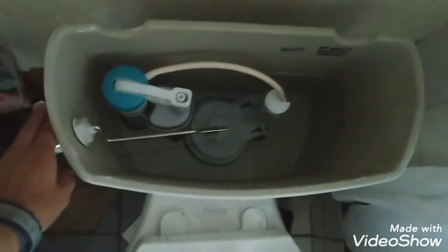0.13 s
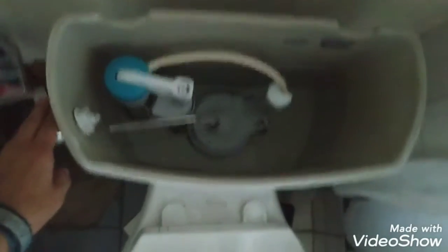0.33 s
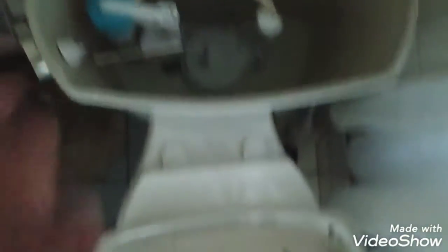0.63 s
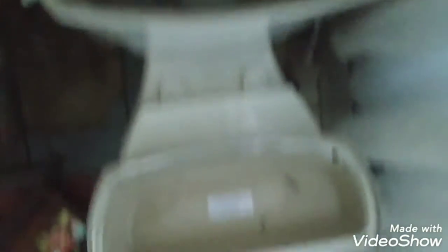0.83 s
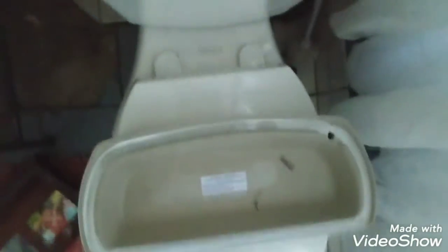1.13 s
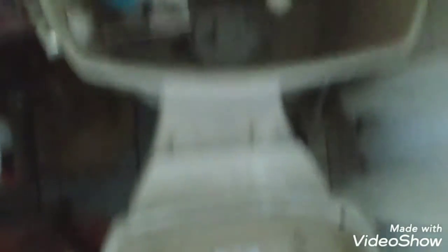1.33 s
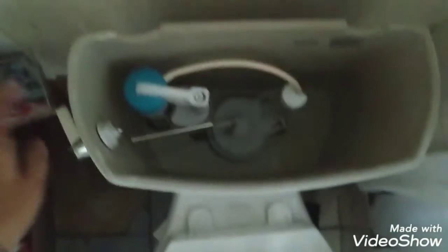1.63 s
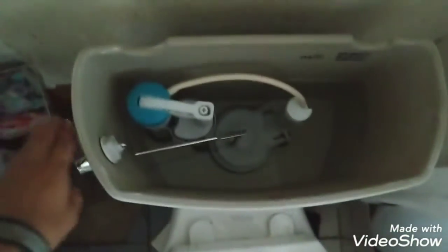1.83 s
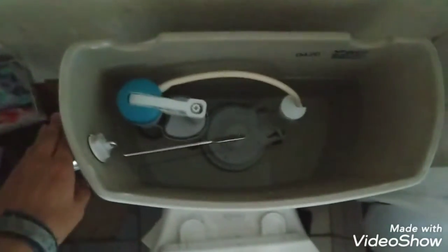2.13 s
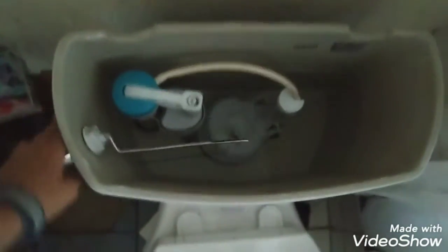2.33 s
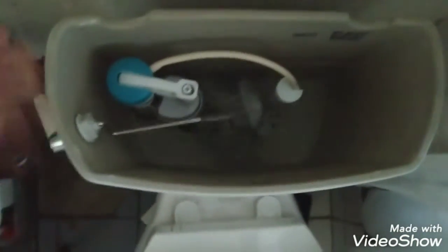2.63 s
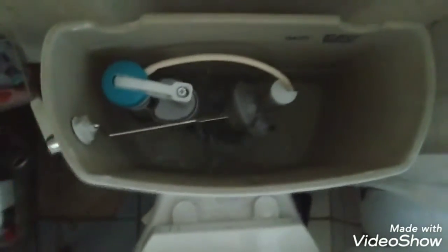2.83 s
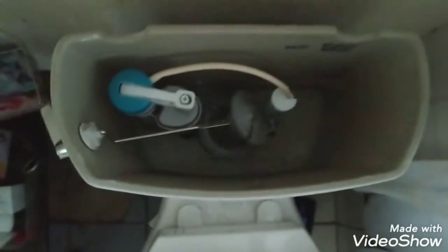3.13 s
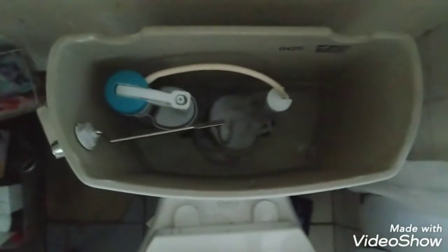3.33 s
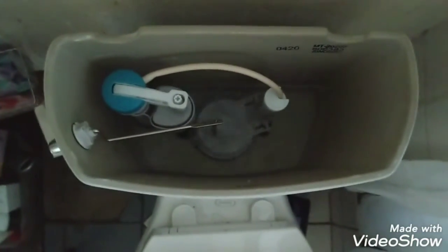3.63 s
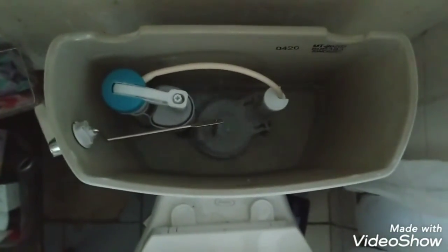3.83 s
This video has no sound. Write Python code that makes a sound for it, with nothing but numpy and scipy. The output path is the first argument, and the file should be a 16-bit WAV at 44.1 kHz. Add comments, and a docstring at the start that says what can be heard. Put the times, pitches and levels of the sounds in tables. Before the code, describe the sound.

Toilet flush heard from above the open tank: lever clicks, rushing gurgling water, flapper slap, refill hiss.

```python
"""An open toilet tank is flushed in a small tiled bathroom, heard from just above.
Fingers make the lever squeak, rub and knock, then scuff the microphone in bursts of tiny random clicks.
The lever lifts the flapper and its arm clinks, as wavering sines, while resonant noise, ringing bubbles
and patchy spray gulp and splash down the drain. The flapper slaps shut with a noise burst and ringing;
the fill valve starts to hiss with patchy noise and squeals with wavering sines as the last water surges."""
import sys
import numpy as np
from scipy import signal
from scipy.fft import rfft, irfft
from scipy.io import wavfile
from scipy.ndimage import uniform_filter1d

SR = 44100
rng = np.random.default_rng(int(sys.argv[2]) if len(sys.argv) > 2 else 0)


def dump_mix(stems):
    """Bounce the given channels to the path in sys.argv[1] as a 16-bit WAV at rate SR."""
    frames = np.atleast_2d(stems).T  # one column per channel
    limited = np.clip(frames, -1, 1)  # hard clip at full scale
    pcm = np.round(limited * 32767).astype(np.int16)
    wavfile.write(sys.argv[1], SR, pcm)


N = 176400
T = np.arange(N) / SR  # time in seconds

ROOM_T60_S, ROOM_DAMP_HZ = 0.18, 6800  # time for the echo to fall by 60 dB, and where its treble dulls
WATER_ROOM_DB = -2
SPRAY_PER_S = 5000


def from_db(db):
    """Turn decibels into a gain."""
    return 10 ** (np.asarray(db) / 20)


def rms_one(x):
    """Scale to unit power."""
    return x / np.sqrt(np.mean(x ** 2) + 1e-20)


def evened(x, window_s):
    """Hold the short-term power close to one."""
    window = max(int(window_s * SR), 8)
    power = np.abs(uniform_filter1d(x * x, window))
    return x / np.sqrt(power + 1e-9)


def coloured(x, colour):
    """Filter through (f/Hz, level/dB) points, with unit power gain and no sound ahead of its cause."""
    hz, db = np.transpose(colour)
    bins_hz = np.arange(N + 1) * SR / (2 * N)
    gain = rms_one(from_db(np.interp(np.log(bins_hz + 1), np.log(hz), db)))
    # folding the cepstrum gives the filter its minimum delay
    cepstrum = irfft(np.log(gain))
    cepstrum[1:N] *= 2
    cepstrum[N + 1:] = 0
    return irfft(rfft(x, 2 * N) * np.exp(rfft(cepstrum)))[:N]


def band(x, low_hz, high_hz):
    """Keep only the frequencies between two limits."""
    return signal.sosfilt(signal.butter(3, [low_hz, high_hz], "band", fs=SR, output="sos"), x)


def drift(rate):
    """Smooth random wandering of unit power; a higher rate in Hz wanders faster."""
    r = np.exp(-2 * np.pi * rate / SR)
    noise = rng.standard_normal(N + SR // 2)
    return rms_one(signal.lfilter([1], [1, -2 * r, r * r], noise)[-N:])


def grains(per_s, spread_db=3):
    """Random clicks of uneven size, scaled to unit power."""
    born = rng.random(N) < per_s / SR
    size = from_db(spread_db * np.minimum(rng.exponential(1, N), 4))
    return rms_one(born * rng.choice([-1, 1], N) * size)


def clicks(rows):
    """Place one click per (t/s, level/dB) row."""
    out = np.zeros(N)
    for s, db in rows:
        out[int(s * SR)] += from_db(db)
    return out


def ring(x, hz, t60):
    """A resonance: a unit click sets a sine of height one ringing, down 60 dB after t60 seconds."""
    r = from_db(-60 / (t60 * SR))
    w = 2 * np.pi * hz / SR
    return signal.lfilter([0, np.sin(w)], [1, -2 * r * np.cos(w), r * r], x + 1e-18)


def struck(hits, modes):
    """Hits ring the modes (f/Hz, level/dB, t60/s) of a body, with alternating sign."""
    out = 0
    for k, (hz, db, t60) in enumerate(modes):
        out = out + from_db(db) * ring(clicks(hits), hz, t60) * (-1) ** k
    return out


def stirred(modes):
    """Noise keeps resonances (f/Hz, width/Hz, level/dB) ringing, as turbulence does."""
    out = 0
    for hz, width, db in modes:
        turbulence = np.diff(rng.standard_normal(N + 1))
        t60 = np.log(1000) / (np.pi * width)
        out = out + from_db(db) * rms_one(ring(turbulence, hz, t60))
    return out


def envelope(s, attack, hold, t60):
    """Rise in a line from time s, then fall exponentially once hold seconds have passed since s."""
    rise = np.clip((T - s) / attack, 0, 1)
    return rise * from_db(-60 * np.clip((T - s - hold) / t60, 0, 3))


def strokes(rows, attack, t60):
    """Sliding contacts (t/s, length/s, final level/dB, swell/dB) change in pressure and let go."""
    out = 0
    for s, length, db, swell in rows:
        pressure_db = db + swell * np.clip((T - s) / length - 1, -1, 0)
        out = out + envelope(s, attack, length, t60) * from_db(pressure_db)
    return out


def bowed(contacts, modes, swell, hold):
    """Sliding contacts (t/s, level/dB, tilt/dB per octave) make metal modes sing, then ring out."""
    chatter_db, chatter_hz = 1.6, 112
    out = 0
    for hz, mode_db, t60 in modes:
        octaves = np.log2(hz / modes[1][0])  # distance from the second mode
        power = 0
        for s, db, tilt in contacts:
            power = power + (from_db(db + mode_db + tilt * octaves) * envelope(s, swell, hold, t60)) ** 2
        # the upper modes are rougher
        chatter = from_db(chatter_db * max(1 + octaves, .5) * drift(chatter_hz))
        out = out + np.sqrt(power) * chatter * np.sin(2 * np.pi * (hz * T + rng.random()))
    return out


def in_room(x, wet_db):
    """Add the dense, quickly dying echo of the tiles."""
    t = T[:SR // 2]
    tail = rng.standard_normal(len(t)) * from_db(-60 * t / ROOM_T60_S) * (t > .004)
    dull = np.exp(-2 * np.pi * ROOM_DAMP_HZ / SR)
    tail = signal.lfilter([1 - dull], [1, -dull], tail / np.sqrt(np.sum(tail ** 2)))
    return x + from_db(wet_db) * signal.fftconvolve(x, tail)[:N]


def bubbles(per_s, low_hz, high_hz, cycles, rise):
    """Bubbles of uneven size ring for some cycles, rising in pitch as they near the surface."""
    out = np.zeros(N + SR)
    for when, pitch, size, chance in rng.random((5000, 4)):
        if chance < per_s * N / SR / 5000:
            hz = low_hz * (high_hz / low_hz) ** pitch
            age = np.linspace(0, 1, int(cycles / hz * SR))
            start = int(when * N)
            tone = np.sin(2 * np.pi * cycles * age * (1 + rise * age / 2))
            out[start:start + len(age)] += from_db(22 * size ** 2 - 50 * age) * tone
    return rms_one(out[:N])


def spatter():
    """Quick, uneven bursts in level, as of broken water."""
    spatter_db, spatter_hz = 1.17, 30
    return from_db(spatter_db * drift(spatter_hz))


def patchy(x):
    """Pockets in the water form and vanish: each narrow band swells and fades by itself."""
    patchy_db, patches_per_s = 5, 9
    count = 80
    spectrum = rfft(x).astype(np.complex64)
    # 14 bands per octave, counted from 280 Hz
    octaves = np.log2(np.arange(len(spectrum)) * SR / N / 280 + 1e-9)
    slot = (14 * octaves).astype(int).clip(0, count - 1)
    knots = np.arange(200) / patches_per_s
    out = 0
    for k, row in enumerate(rng.standard_normal((count, len(knots) + 1))):
        swelling = from_db(patchy_db * row[1:].clip(-2, 2))
        out = out + irfft(spectrum * (slot == k), N) * np.interp(T + row[0] % 1, knots, swelling)
    return rms_one(out)


def background():
    """Quiet room noise with a faint wavering hum, made by noise ringing a narrow resonance."""
    floor_db, hum_db, hum_hz = -61.5, -68, 234.7
    # colour of the room noise: f/Hz, level/dB
    floor_colour = [(25, -9), (55, 3), (95, -10.5), (135, -3), (700, -13.5), (1600, -19.5), (16000, -31)]
    floor = coloured(rng.standard_normal(N), floor_colour)
    return from_db(floor_db) * floor + from_db(hum_db) * stirred([(hum_hz, 5, 0)])


def handling():
    """Dry scuffs right at the microphone, each with a small final thud, and bumps."""
    lift_off_hz, lift_off_t60_s, lift_off_db = 118, 0.052, -4.5
    # scuffs on the microphone: t/s, length/s, final level/dB, swell/dB
    scuff_rows = [(0.975, 0.051, -62, -4.5), (1.114, 0.012, -38, 18), (1.1403, 0.00094, -32, 0),
                  (1.144, 0.008, -42, 16), (1.237, 0.0048, -34.5, 7), (1.245, 0.015, -40, 13),
                  (1.427, 0.043, -51, 1), (1.4992, 0.0254, -21, 17)]
    # colour of the scuffs: f/Hz, level/dB
    scuff_colour = [(30, -11), (160, -3), (2400, -5.5), (4000, -9.5), (6400, -11), (7400, -21.5),
                    (8500, -31.5), (11000, -23.5), (16000, -23)]
    # bumps and pops: t/s, half length/s, f/Hz, peak level/dB
    bump_rows = [(0.983, 0.08, 67, -49.5), (0.991, 0.01, 187, -40), (1.014, 0.011, 117, -30.5),
                 (1.5273, 0.001, 770, -18.5), (3.003, 0.016, 62.4, -31), (3.744, 0.0092, 179, -23)]
    scuff = grains(9000, spread_db=-0.5) * strokes(scuff_rows, attack=0.0021, t60=0.015)
    scuff = coloured(scuff, scuff_colour)
    lift_offs = [(s + length, db + lift_off_db) for s, length, db, _ in scuff_rows]
    thud = ring(clicks(lift_offs), lift_off_hz, lift_off_t60_s)
    bumps = 0
    for s, half, hz, db in bump_rows:
        swing = np.sin(2 * np.pi * hz * (T - s))
        bumps = bumps + from_db(db) * np.exp(-((T - s) / half) ** 2) * swing
    return in_room(scuff + thud + bumps, wet_db=-28.5)


def lever():
    """The handle squeaks, rubs and knocks; its arm clinks against the stop and sings as it slides along it."""
    knock_s, crack_db, crack_t60_s = .528, -5.5, 0.013
    # the lever rubs in its seat: t/s, length/s, final level/dB, swell/dB
    rub_rows = [(.41, 0.18, -56, 6), (.526, 0.014, -54, -7), (2.16, 0.034, -55, -6)]
    # colour of the rubs: f/Hz, level/dB
    rub_colour = [(50, -54), (190, 5), (900, -6), (2500, -17), (8500, -32.5)]
    # the handle squeaks: t/s, level/dB, tilt/dB per octave
    squeaks = [(.415, -67, 9), (.429, -55, -2.5), (.549, -55.5, -1)]
    # ring of the handle: f/Hz, level/dB, t60/s
    handle_modes = [(2460, 2.5, 0.047), (4240, -6.5, 0.046), (6298, -5, 0.09), (10810, -9.5, 0.07),
                    (13900, -8, 0.07)]
    # ring of the tank wall when the handle knocks on it: f/Hz, level/dB, t60/s
    knock_modes = [(778, -48.5, 0.14), (1346, -54.5, 0.19)]
    # the arm hits its stop: t/s, level/dB, tilt/dB per octave
    clinks = [(2.482, -54.5, 0), (2.543, -48.5, 4), (2.714, -29, 0.5), (2.788, -40.5, 4.5)]
    # ring of the arm: f/Hz, level/dB, t60/s
    arm_modes = [(697, -10.5, 1), (1498, 2, 0.42), (6310, -10, 0.28), (10800, -30, 0.29)]
    rub = coloured(grains(2500) * strokes(rub_rows, attack=0.0017, t60=0.053), rub_colour)
    strength = 0
    for s, db, tilt in clinks:
        strength = strength + from_db(db + 2 * tilt + crack_db) * envelope(s, 0.00045, 0.0011, crack_t60_s)
    crack = band(grains(6300), 1970, 21000) * strength
    knock = struck([(knock_s, 0)], knock_modes)
    squeak = bowed(squeaks, handle_modes, swell=0.011, hold=0.011)
    clink = bowed(clinks, arm_modes, swell=0.0063, hold=0.032)
    return in_room(rub + crack + knock, wet_db=-1) + squeak + clink


def fill_valve():
    """The valve starts a sputtering hiss that swells while brief high squeals sound over it."""
    waver_hz, squeal_t60_s, rough_db = 108.6, 0.036, 3
    hiss_s, hiss_rise_s, hiss_db = 3.802, 0.19, -36
    # squeals: t/s, length/s, f/Hz, level/dB
    squeals = [(3.831, 0.0047, 10460, -29), (3.863, 0.023, 10770, -26.5), (3.892, 0.045, 10900, -48)]
    # colour of the hiss: f/Hz, level/dB
    hiss_colour = [(500, 5.5), (3000, -13), (4600, 1), (7600, 1), (9000, -3), (11800, 1.5), (12800, 0),
                   (16000, -5)]
    squeal = 0
    for s, length, hz, db in squeals:
        phase = 2 * np.pi * np.cumsum(hz + waver_hz * drift(217)) / SR
        rough = from_db(db + rough_db * drift(220))
        squeal = squeal + np.sqrt(2) * np.sin(phase) * rough * envelope(s, 0.0052, length, squeal_t60_s)
    swelling = np.clip((T - hiss_s) / hiss_rise_s, 0, 1)
    hiss = coloured(patchy(grains(15000)), hiss_colour) * spatter() * swelling
    return in_room(squeal, wet_db=-2) + from_db(hiss_db) * hiss


def flapper():
    """The flapper slaps onto its seat and the water hammer rings the tank."""
    slap_s, slap_db, ring_delay_s = 3.751, -25, .01
    # colour of the slap: f/Hz, level/dB
    slap_colour = [(60, -16), (330, 3.5), (800, -9), (1400, -6.5), (5000, -7.5), (7000, -15), (8500, -28),
                   (11000, -24.5), (16000, -33)]
    # what the slap rings with: f/Hz, level/dB, t60/s
    slap_modes = [(254, -24.5, 0.25), (330, -28, 0.33), (608, -25, 0.15), (1447, -21, 0.12),
                  (3750, -26, 0.11), (4950, -23.5, 0.072)]
    burst = grains(7000) * envelope(slap_s, attack=0.00078, hold=0.012, t60=0.12)
    slap = from_db(slap_db) * coloured(burst, slap_colour)
    return in_room(slap, wet_db=-1) + struck([(slap_s + ring_delay_s, 0)], slap_modes)


def plops():
    """Single loud bubbles and droplets swell, rise a little in pitch and ring, the lower ones longer."""
    swell_cycles, ring_cycles, rise = 7.1, 118, 0.028
    # single loud bubbles and droplets, in time order: t/s, f/Hz, level/dB
    plop_rows = [(2.526, 845, -33), (2.59, 1473, -32.5), (2.607, 2880, -29.5), (2.625, 590, -34.5),
                 (2.827, 5750, -34), (2.87, 558, -35), (3.02, 558, -32.5), (3.215, 565, -35),
                 (3.296, 574, -24), (3.665, 290, -33.5)]
    out = 0
    for s, hz, db in plop_rows:
        swell, t60 = swell_cycles / hz, ring_cycles / hz
        pitch = hz * (1 + rise * np.clip((T - s) / t60, 0, 1))
        phase = 2 * np.pi * np.cumsum(pitch) / SR
        out = out + from_db(db) * np.sin(phase) * envelope(s, swell, swell, t60)
    return in_room(out, wet_db=-13.5)


def glugs():
    """Each trapped air pocket booms on one wavering pitch until the next one takes its place."""
    glug_t60_s, waver, rough_db = 0.27, 0.026, 3.5  # waver is a share of the pitch
    # air pockets glug in the drain: t/s, swell/s, hold/s, f/Hz, level/dB
    glug_rows = [(2.62, 0.0091, 0.032, 338.8, -32), (2.67, 0.0045, 0.012, 203.6, -22.5),
                 (2.774, 0.021, 0.027, 162.5, -37.5), (2.872, 0.022, 0.055, 198, -30.5),
                 (2.947, 0.0082, 0.034, 200.5, -26.5), (3.07, 0.013, 0.017, 189.3, -32),
                 (3.197, 0.073, 0.099, 203, -29)]
    out = np.zeros(N)
    for s, swell, hold, hz, db in glug_rows:
        phase = 2 * np.pi * np.cumsum(hz * (1 + waver * drift(34.0))) / SR
        rough = from_db(db + rough_db * drift(51))
        boom = np.sqrt(2) * np.sin(phase) * rough * envelope(s, swell, hold, glug_t60_s)
        out = out * np.clip(1 - (T - s) / swell, 0, 1) + boom
    return out


def surging(t60, axis):
    """Strength of one level column of the surges; overlapping surges add in power."""
    # surges of water: t/s, swell/s, hold/s, boom level/dB, churn level/dB, splash level/dB
    surges = [(2.381, 0.023, 0.27, -55, -58, -65), (2.488, 0.062, 0.095, -41.5, -34.5, -41),
              (2.681, 0.033, 0.1, -29.5, -30, -40.5), (2.918, 0.041, 0.26, -39, -47, -52),
              (3.207, 0.065, 0.061, -39, -37.5, -42.5), (3.265, 0.049, 0.098, -75, -64, -32.5),
              (3.469, 0.045, 0.19, -39, -44.5, -43), (3.81, 0.07, 0.11, -42.5, -52.5, -51.5)]
    power = 0
    for s, swell, hold, *levels in surges:
        power = power + (from_db(levels[axis]) * envelope(s, swell, hold, t60)) ** 2
    return np.sqrt(power)


def drain_boom():
    """Turbulent water keeps the low resonances of the drain booming."""
    gulp_db = -0.5
    # resonances of the drain: f/Hz, width/Hz, level/dB
    drain_modes = [(145, 9.5, -4.5), (149.4, 31, 1), (196.1, 9, 4), (307, 97, -2.5)]
    boom = evened(band(stirred(drain_modes), 135, 260), window_s=0.08)
    return from_db(gulp_db) * boom * surging(t60=1, axis=0)


def churning():
    """Bubbles and patchy wash churn, and the tank rings more as it empties."""
    bubble_db, wash_db, tank_db = -4, -5.5, 4.5
    tank_opens_s, tank_opening_s = 2.715, 1
    # colour of the wash: f/Hz, level/dB
    churn_colour = [(60, -25), (200, -2), (330, 5), (500, -0.5), (800, 3.5), (1200, -4), (2000, -12.5),
                    (5000, -32)]
    # resonances of the emptying tank: f/Hz, width/Hz, level/dB
    tank_modes = [(584, 25, 0.5), (931, 28, -3), (996, 10.5, -1), (1367, 72, -4)]
    burble = in_room(bubbles(300, 279.4, 1125, cycles=77.6, rise=0.27), WATER_ROOM_DB)
    burble = evened(burble, window_s=0.078)
    wash = coloured(patchy(grains(SPRAY_PER_S)), churn_colour)
    emptying = np.clip((T - tank_opens_s) / tank_opening_s, 0, 1)
    hollow = evened(band(stirred(tank_modes), 500, 2100), window_s=0.12) * emptying
    churn = from_db(bubble_db) * burble + from_db(wash_db) * wash + from_db(tank_db) * hollow
    return churn * surging(t60=0.99, axis=1)


def splashing():
    """Crackling spray and small ringing droplets follow the surges and short splats of thrown water."""
    spray_db, droplet_db = -2.5, -4.5
    splat_swell_s, splat_t60_s = 0.0047, 0.2
    # colour of the spray: f/Hz, level/dB
    splash_colour = [(300, -70), (900, -13), (1500, 3), (4000, -1), (6500, -6.5), (7400, -9), (8400, -26),
                     (10500, -15), (16000, -24.5)]
    # short splats of thrown water: t/s, level/dB
    splat_rows = [(2.422, -54), (2.53, -35.5), (2.715, -33), (2.742, -37.5), (2.996, -43.5), (3.535, -38),
                  (3.729, -39.5)]
    drops = in_room(bubbles(700, 1299, 6115, cycles=75, rise=0.18), WATER_ROOM_DB)
    spray = coloured(patchy(grains(SPRAY_PER_S, spread_db=0.0)), splash_colour)
    spray = rms_one(in_room(spray, WATER_ROOM_DB))
    splash = (from_db(spray_db) * spray + from_db(droplet_db) * drops) * spatter()
    splats = 0
    for s, db in splat_rows:
        splats = splats + from_db(db) * envelope(s, splat_swell_s, splat_swell_s, splat_t60_s)
    return splash * np.hypot(surging(t60=0.84, axis=2), splats)


def water():
    """The flush adds up the boom of the drain, the churning bubbles and the splashing spray."""
    return drain_boom() + churning() + splashing()


def scene():
    """All sources at one microphone."""
    surroundings = background() + handling()
    mechanism = lever() + fill_valve() + flapper()
    flush = plops() + glugs() + water()
    return (surroundings + mechanism + flush)[None]


def record(dry):
    """The deepest bass rolls off and the top is cut steeply."""
    low_cut_hz, cutoff_hz = 64, 15900
    thin = signal.sosfilt(signal.butter(2, low_cut_hz, "high", fs=SR, output="sos"), dry)
    return signal.sosfilt(signal.ellip(12, .1, 80, cutoff_hz, fs=SR, output="sos"), thin)


dry = scene()
out = record(dry)
dump_mix(out)
```